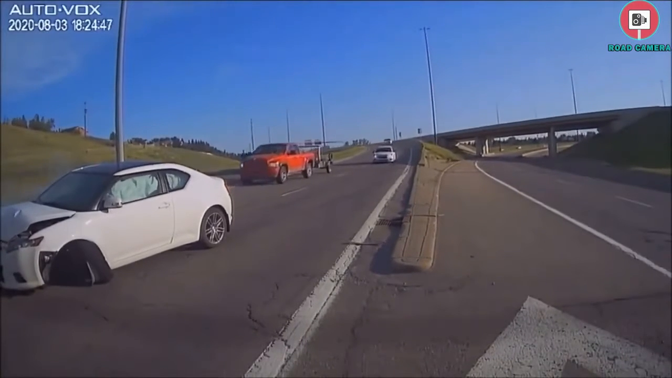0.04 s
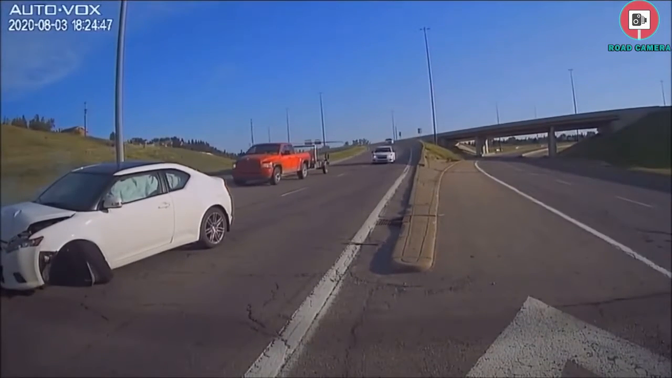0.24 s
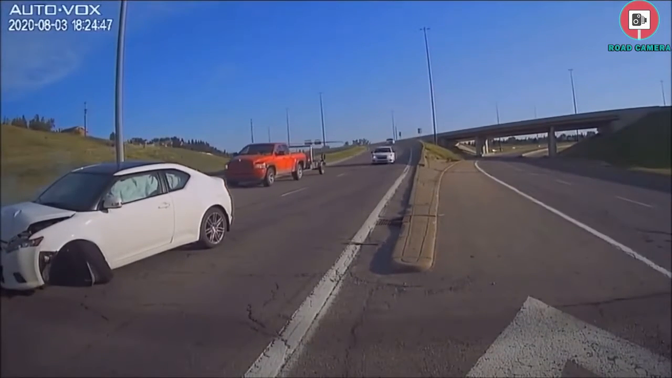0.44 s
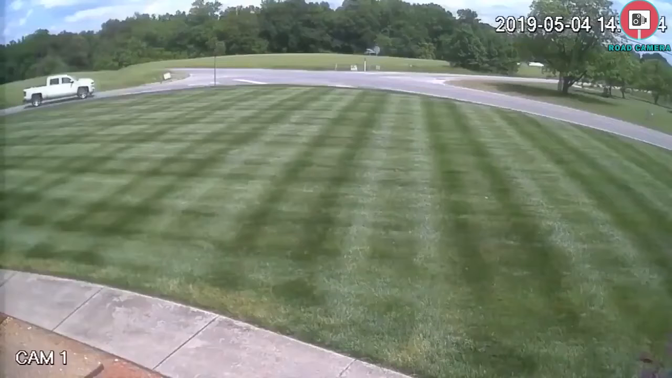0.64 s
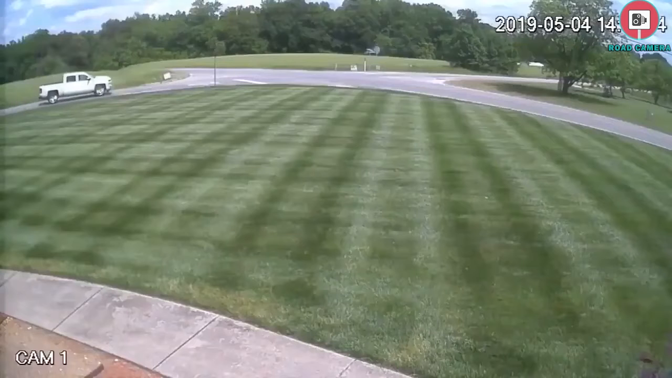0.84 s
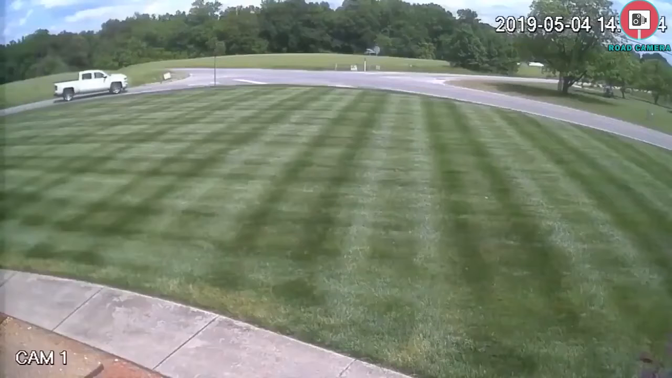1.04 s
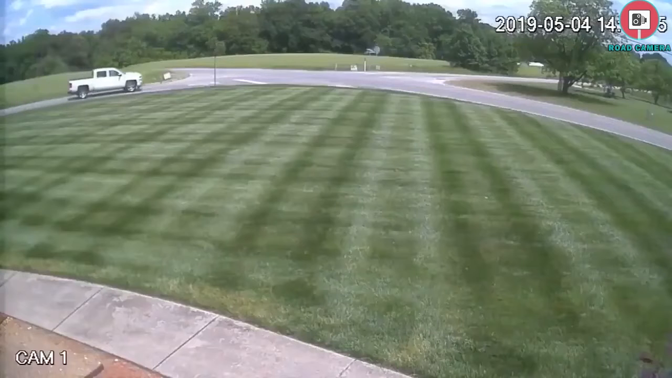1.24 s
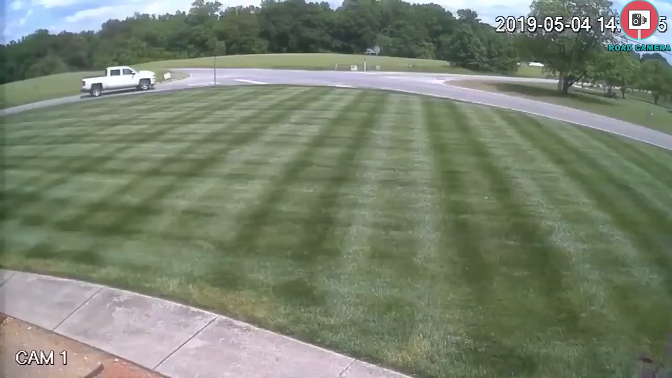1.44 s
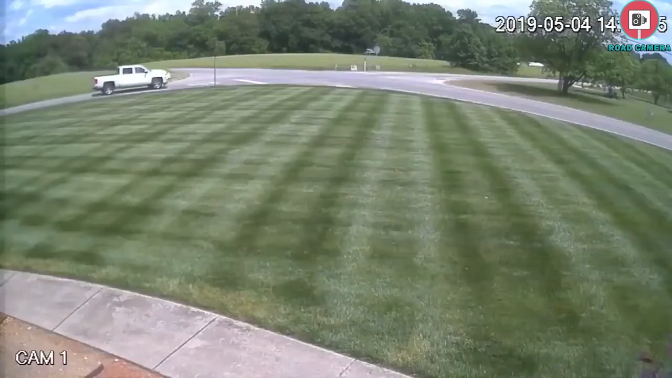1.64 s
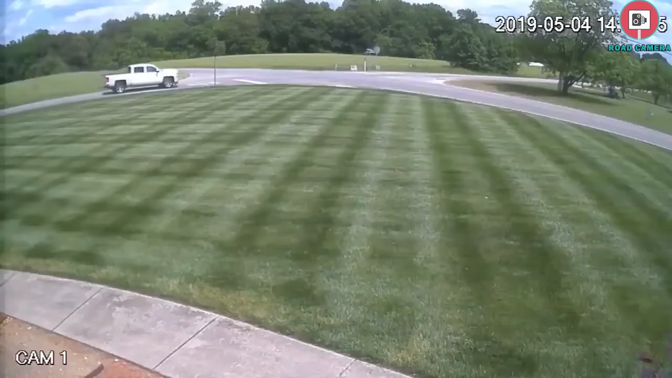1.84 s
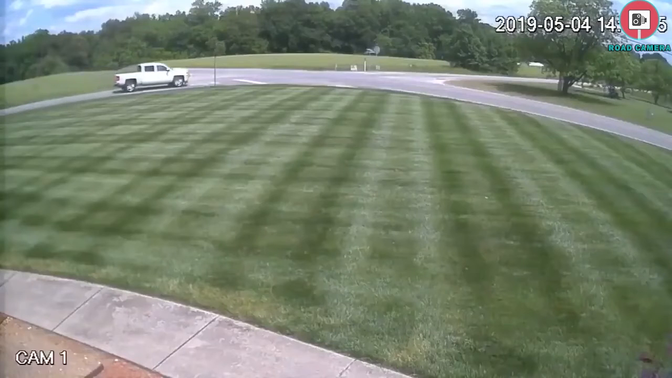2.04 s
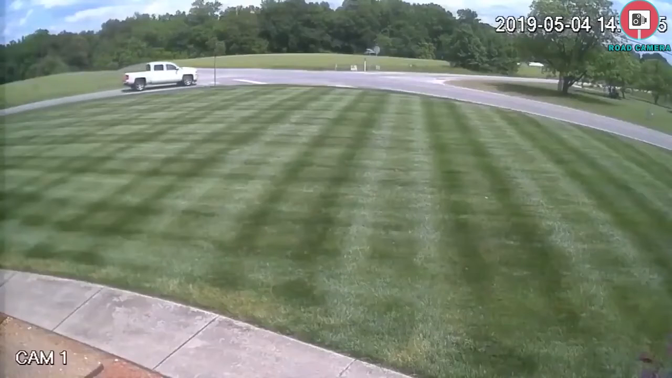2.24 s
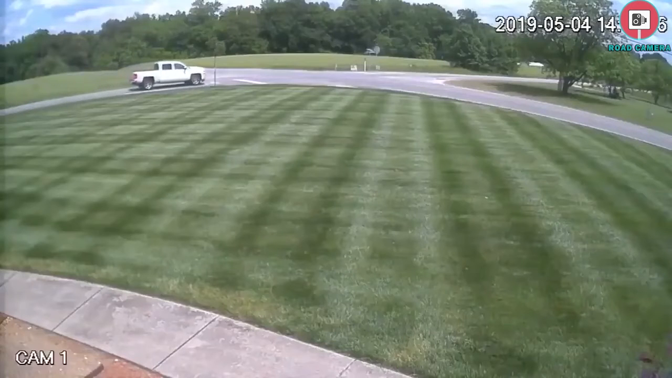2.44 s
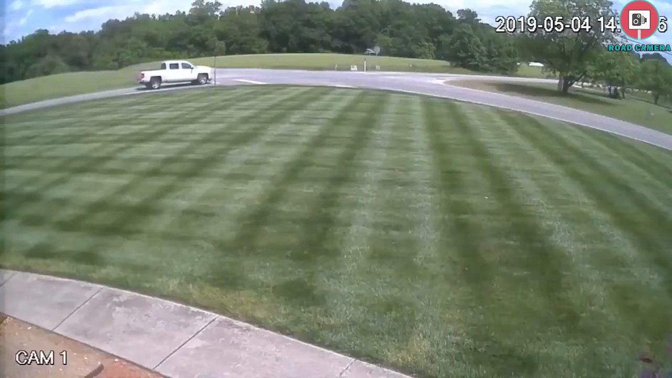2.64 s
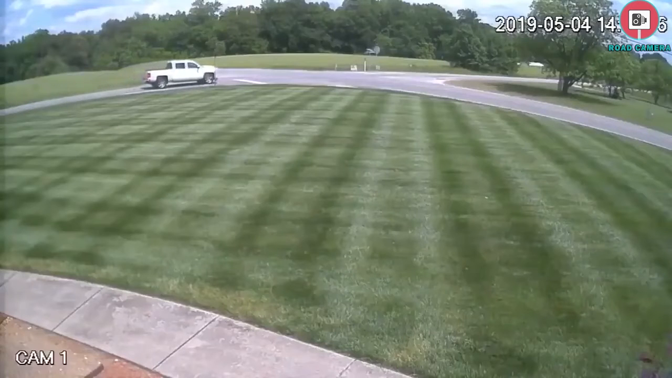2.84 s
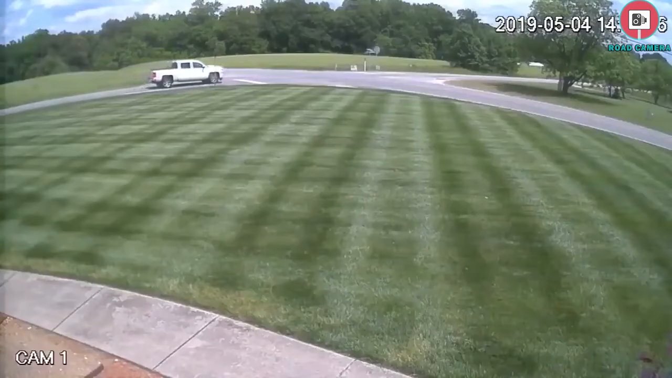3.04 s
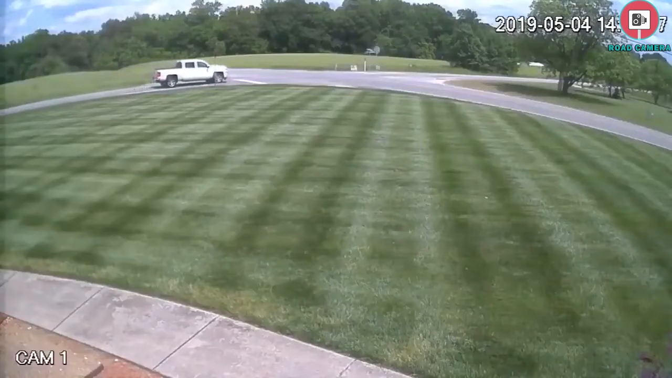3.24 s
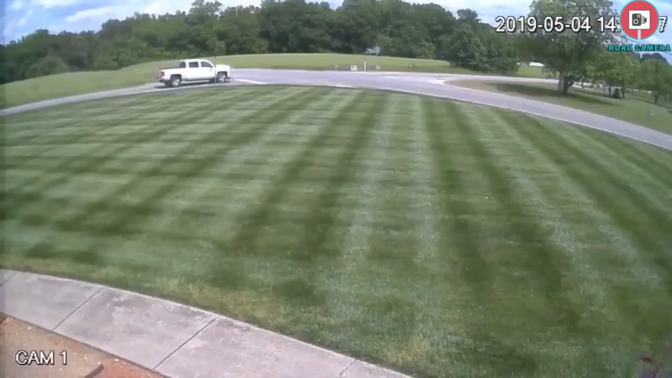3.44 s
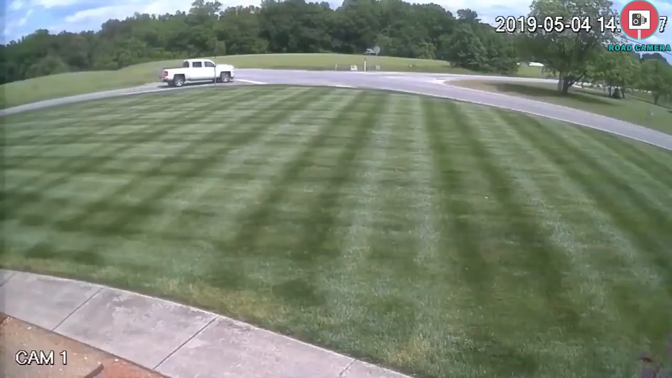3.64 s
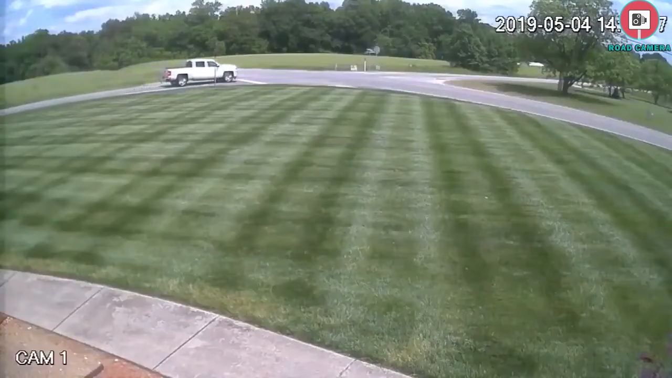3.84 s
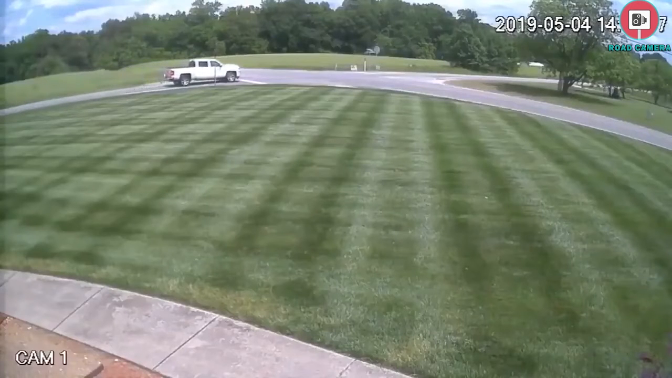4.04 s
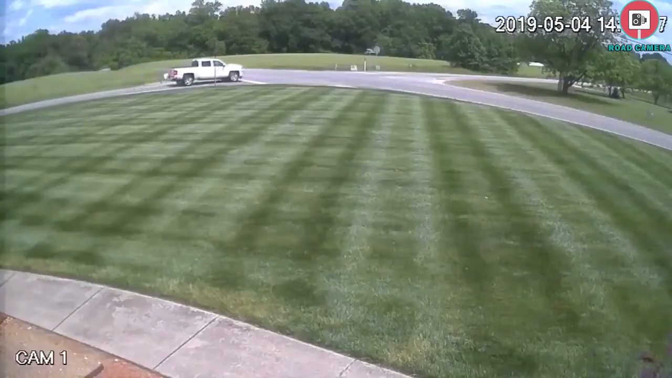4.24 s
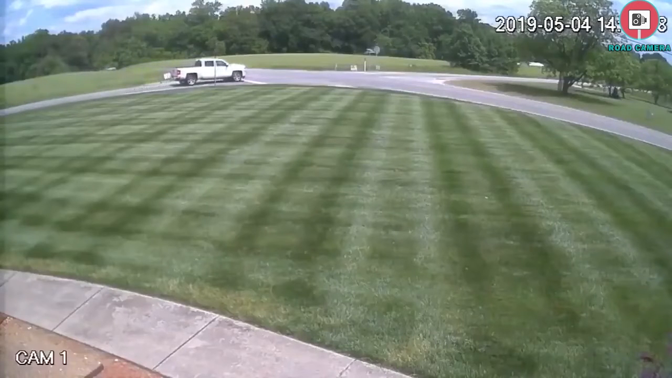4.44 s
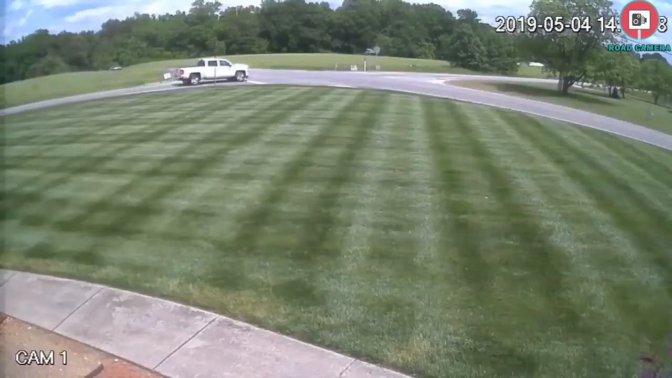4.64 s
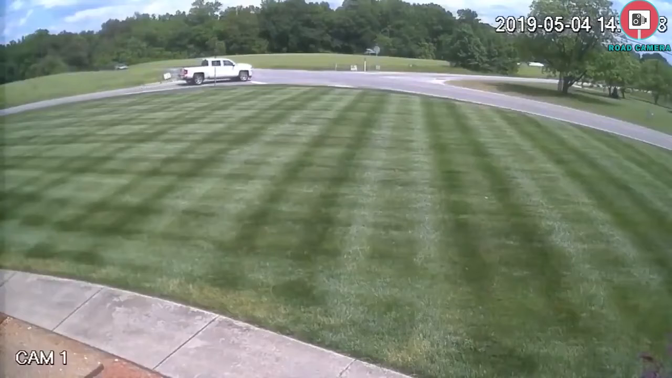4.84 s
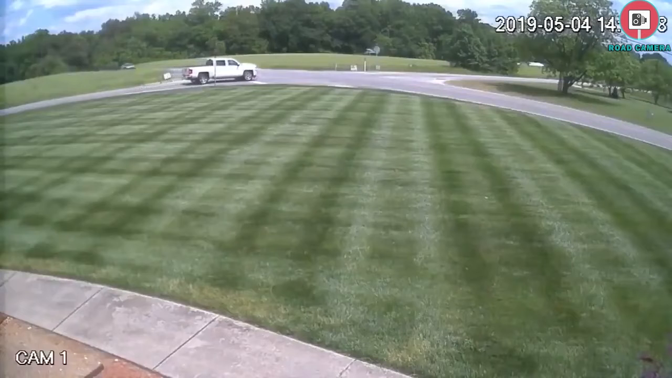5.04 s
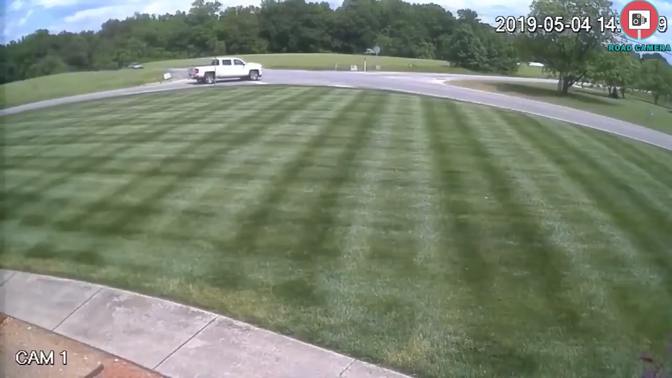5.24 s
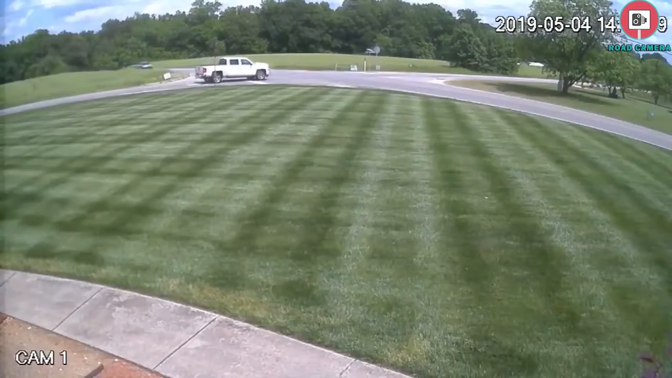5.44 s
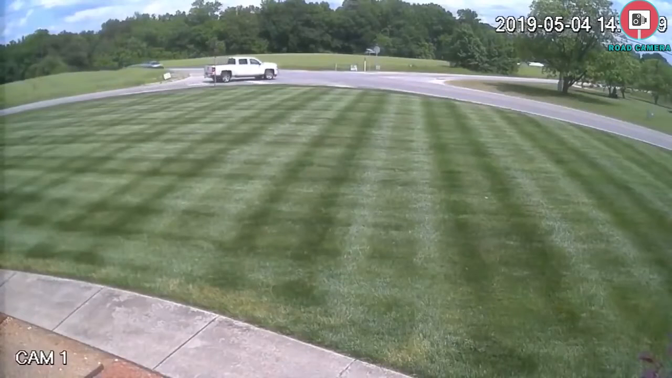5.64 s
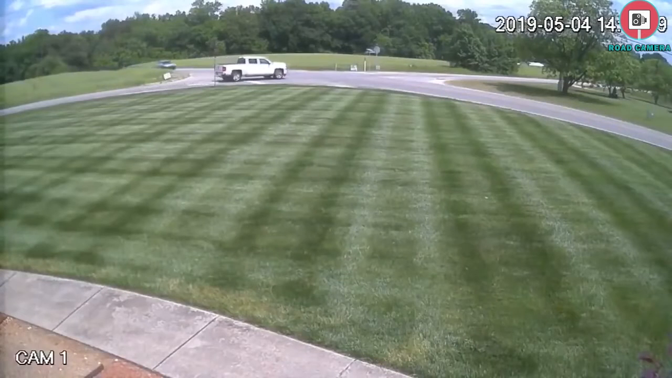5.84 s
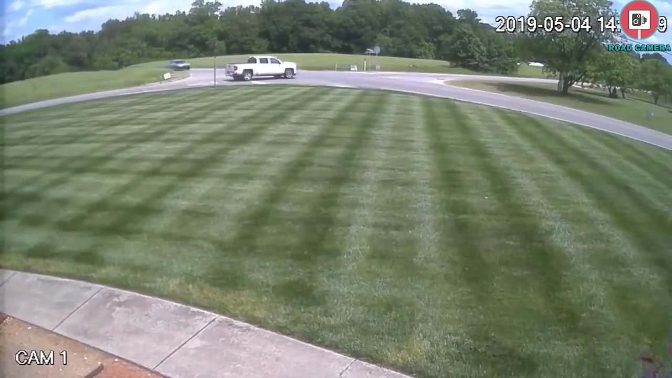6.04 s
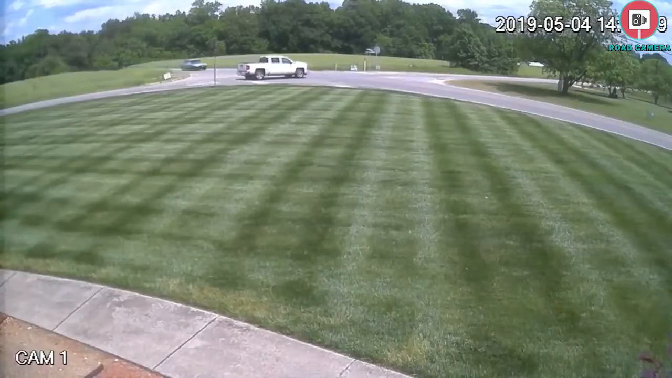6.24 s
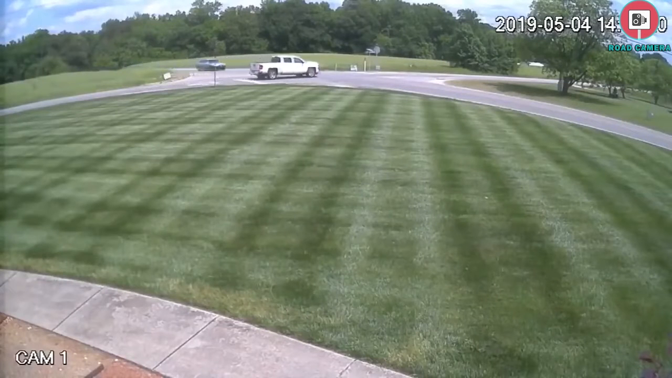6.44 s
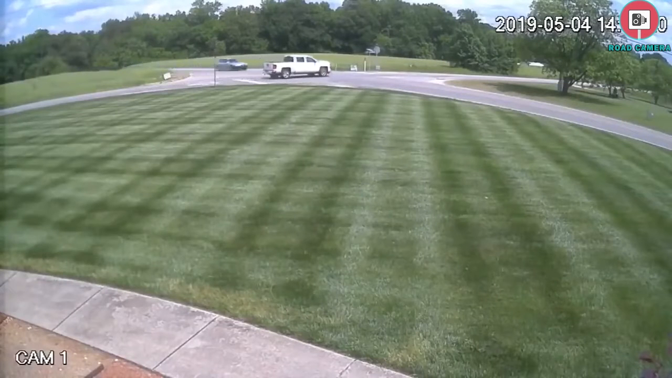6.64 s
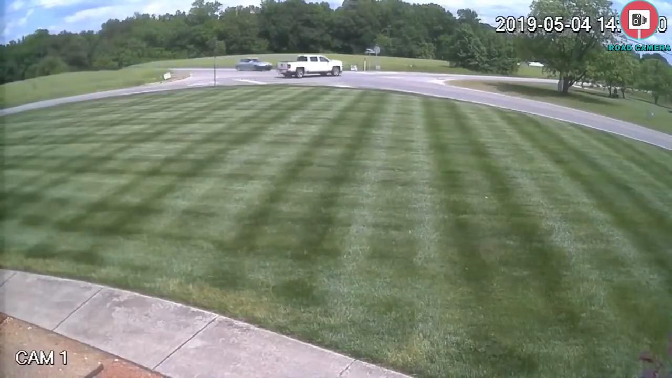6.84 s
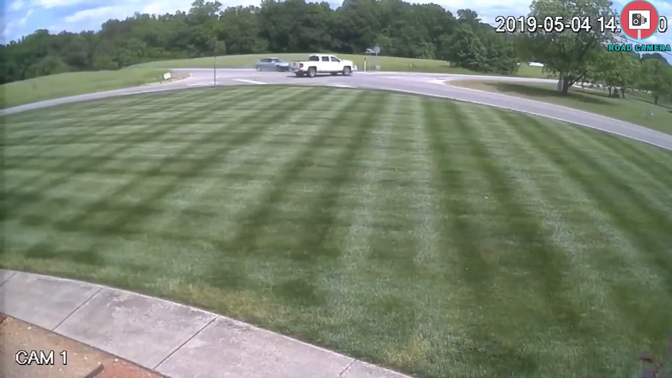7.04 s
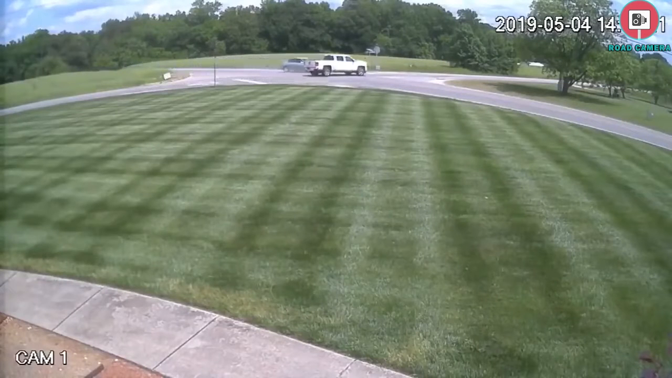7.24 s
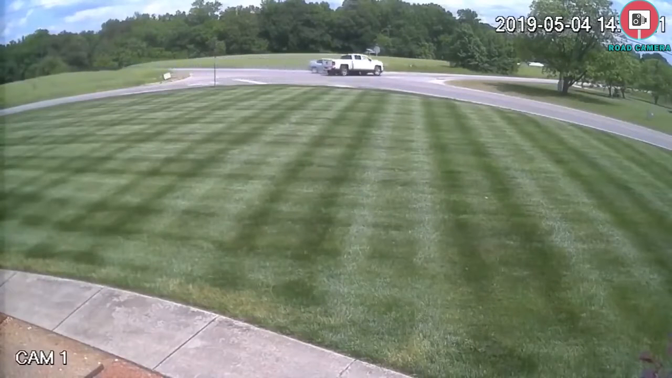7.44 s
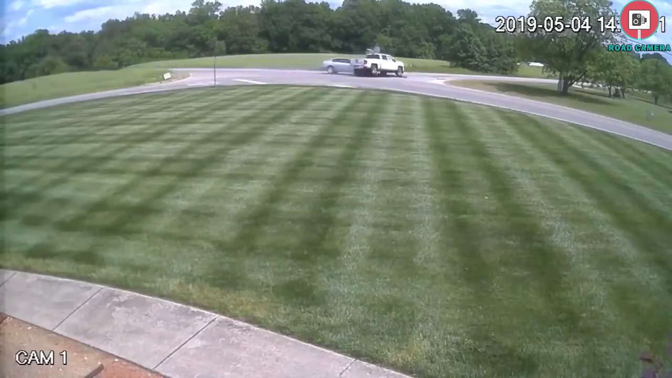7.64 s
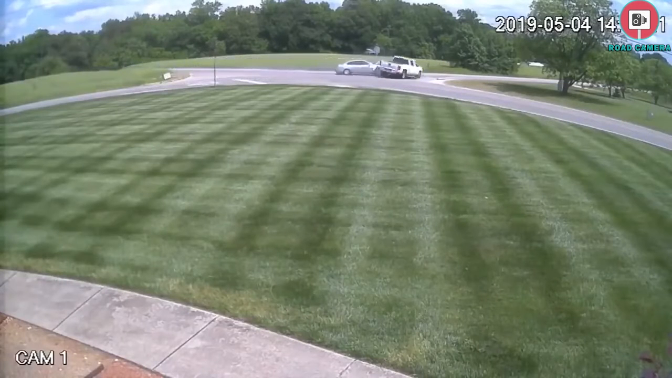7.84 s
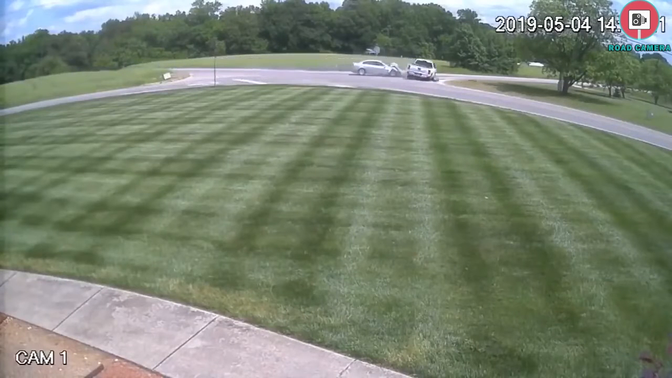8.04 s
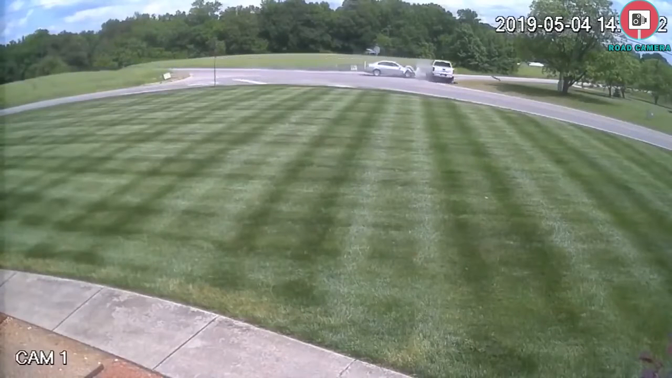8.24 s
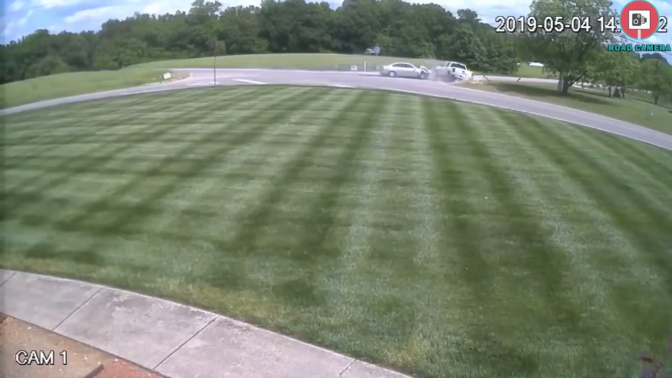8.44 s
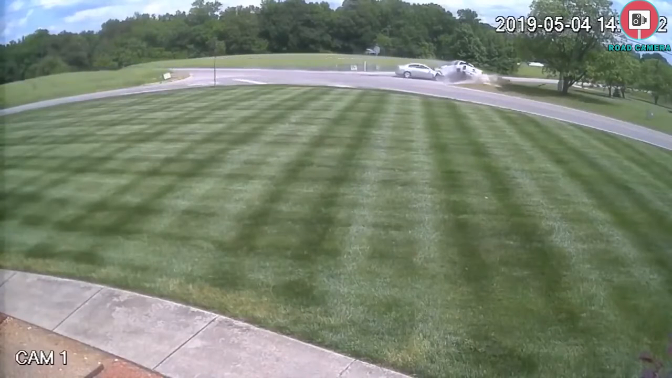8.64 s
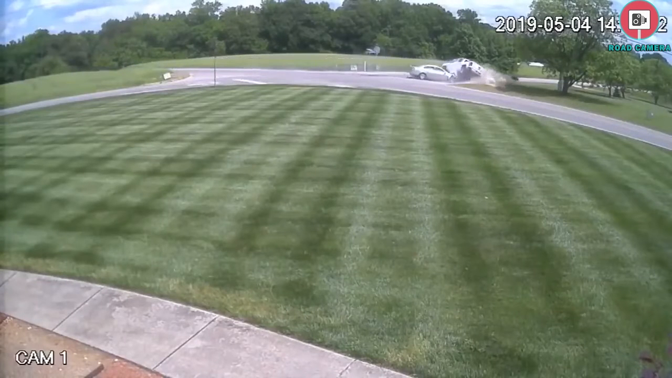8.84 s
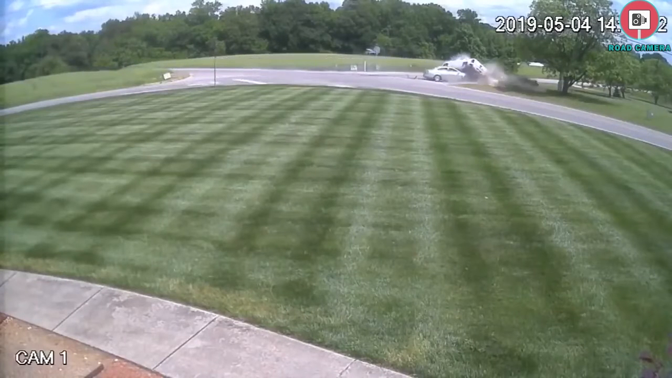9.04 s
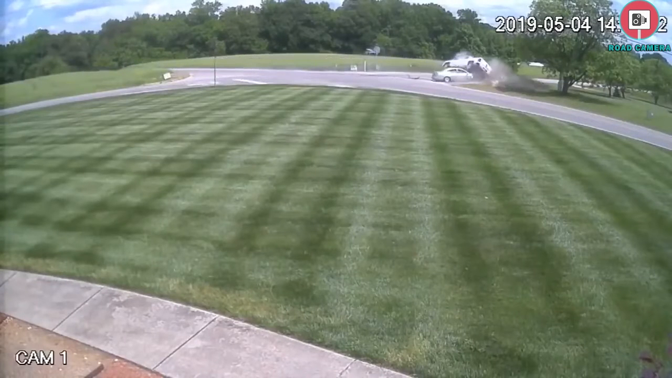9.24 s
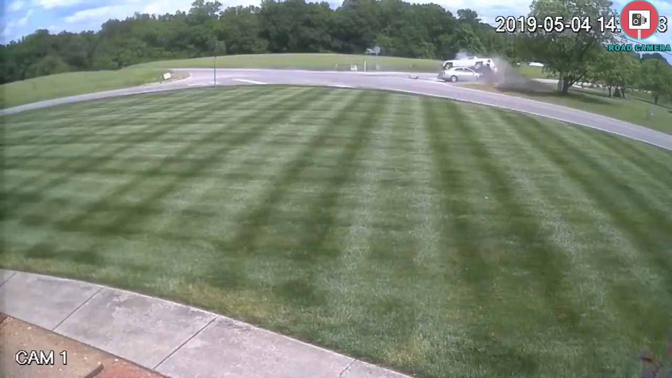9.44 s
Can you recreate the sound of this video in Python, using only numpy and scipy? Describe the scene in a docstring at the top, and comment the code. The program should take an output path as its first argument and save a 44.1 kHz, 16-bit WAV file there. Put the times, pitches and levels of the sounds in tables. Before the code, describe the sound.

A small outdoor roadside microphone, muffled and easily overloaded, picks up low steady rumble and tyre roar. Engine drone and growl build gradually. A short high chirp leads into a rough, wavering tyre squeal lasting under a second. The collision is sudden and very loud: distorted snaps and tearing panels, then crunching, rattling metal dragged along the road, fading until a deep thud and a last cracking bang.

```python
"""Road collision, roadside microphone

Through a small, dull outdoor microphone that overloads: shaped-noise road rumble and an engine drone grow,
a tyre chirps, then the tyres squeal as wavering tones over rubbery noise, with harsh overload treble. Panels
buckle in a volley of clipped snaps and tearing. Grains of metal crunch and groan along the road; the body
thuds down and bangs once more."""
import sys
import numpy as np
from scipy import signal
from scipy.fft import rfft, irfft
from scipy.io import wavfile

SR = 44100
rng = np.random.default_rng(int(sys.argv[2]) if len(sys.argv) > 2 else 0)


def master_out(mix):
    """Clip the mix to full scale and print it as 16-bit PCM to the path in sys.argv[1]."""
    frames = np.transpose(np.atleast_2d(mix))
    ceiling = np.clip(frames, -1, 1)
    pcm = np.round(ceiling * 32767).astype(np.int16)
    wavfile.write(sys.argv[1], SR, pcm)


N = 418950
TIME = np.arange(N) / SR
FREQ = np.maximum(np.fft.rfftfreq(N, 1 / SR), 1)

# Loudest cracks of buckling panels, drive before overload: start_s, drive_db, tear_length_s
PANEL_CRACKS = [(7.6525, -4, 0.00018), (7.6575, -0.5, .0006), (7.665, -6, .003), (7.6693, -2, .003),
                (7.6785, 4, .0022), (7.6852, 5, .0004), (7.6895, -3, .0015), (7.6985, -0.5, 0.0036),
                (7.7072, -1, .0013), (7.7172, 9.5, .0007), (7.7193, 1.5, .0044), (7.7285, -1, 0.0026),
                (7.7468, -1.5, 0.00087), (7.7553, -1.5, 0.0022), (7.7655, -1.5, 0.0036),
                (9.336, -6.5, 0.0036), (9.3685, -1, 0.001), (9.3742, -0.5, 0.0014), (9.4003, 1, .0005)]


def buckling():
    """Each panel gives way with a pressure snap and milliseconds of tearing, clipped by the microphone."""
    snaps, tears = np.zeros(N), np.zeros(N)
    t = np.arange(SR // 40) / SR
    rise = t / 0.00045
    snap = (rise * np.exp(1 - rise)) ** 2
    for k, (start, db, length) in enumerate(PANEL_CRACKS + volley()):
        span = slice(int(start * SR), int(start * SR) + len(t))
        # the overloaded microphone's pulses alternate in sign
        snaps[span] += undb(db) * (-1) ** k * snap
        fizz = undb(-31.5) * np.exp(-t / 0.0095)
        tears[span] += undb(db) * (np.exp(-(t / length) ** 4) + fizz)
    # the overloaded microphone clips the cracks and keeps the tearing dense
    tear_colour = [(350, -3.5), (900, 4), (2000, -0.5), (4000, -12), (9000, -14.5)]
    tearing = np.tanh(2 * colour(noise(), tear_colour))
    clipped = np.tanh(snaps * undb(2) + tears * tearing * undb(4))
    # the treble arrives muffled
    muffling = [(30, 1.5), (2100, -3.0), (3000, -7), (4000, -16), (5000, -35.5), (8000, -36.5), (15000, -43.0)]
    return shape(clipped, muffling)


# Lesser cracks follow at uneven gaps as the first impact closes up
VOLLEY_S, VOLLEY_GAP_S, VOLLEY_LENGTH_S = 7.733, .0064, .0021
VOLLEY_DB, VOLLEY_SPREAD_DB = -6, 2.5


def volley(count=9):
    """Lesser panel cracks scattered about an even spacing: rows of start_s, drive_db, tear_length_s."""
    cracks = []
    for k, (shift, size) in enumerate(rng.standard_normal((count, 2))):
        start = VOLLEY_S + VOLLEY_GAP_S * (k + .3 * shift)
        cracks.append((start, VOLLEY_DB + VOLLEY_SPREAD_DB * size, VOLLEY_LENGTH_S))
    return cracks


# The wreck is crushed each time it lands or is struck; strengths before each layer's trim:
# start_s, length_s, boom_db, crunch_db, crackle_db
CRUSH_EVENTS = [(7.79, .02, -13, -17.5, -32), (7.83, 0.12, -19.5, -17.5, -33), (8.08, 0.023, -31, -23, -44),
                (8.23, 0.039, -28, -14.5, -37), (8.3, .04, -25, -17, -40.5),
                (8.72, 0.093, -12.5, -32.5, -57), (8.825, 0.031, -12.5, -18.5, -48),
                (9.28, 0.067, -15, -13.5, -38), (9.39, 0.021, -10, -19, -42),
                (9.46, 0.052, -14, -21.5, -45)]
CRUSH_ATTACK_S, CRUSH_RELEASE_S, CRUMPLE_DB = 0.018, 0.044, -1.5
# Colours of body boom, sheet metal, plastic crunch and overload crackle: freq_hz, level_db
BOOM_COLOUR = [(30, -17), (52, -9.5), (95, -5), (130, -4), (180, 1), (220, -5.5), (290, -12.5), (360, -8)]
CRUMPLE_COLOUR = [(140, -42.5), (230, -8.5), (291, -7), (344, -0.5), (420, -4.5), (448, 3), (487, -5),
                  (590, -0.5), (709, -2.5), (915, 1.5), (1200, -11.5), (1250, -10), (1620, -43),
                  (2750, -120)]
CRUNCH_COLOUR = [(1100, -2.5), (1280, -7), (1400, 3), (1620, -2.5), (1800, -0.5), (1950, 5), (2130, -2.5),
                 (2350, -11), (2550, -13.5), (2700, -12), (3000, -23.5), (3600, -34.5), (4400, -62.5)]
CRACKLE_COLOUR = [(2000, -21), (3200, 8), (4200, -4.5), (5800, -14), (8000, -26.5), (12000, -31),
                  (16000, -34.5)]
# Metal digs into the road and groans: start_s, length_s, level_db
GROAN_EVENTS = [(8.085, 0.087, -8), (8.335, 0.033, -12), (8.58, .02, -16)]
# Partials of the groan: multiple_of_stick_slip_rate, level_db
GROAN_PARTIALS = [(1, 0), (2, -2.5), (3, -9.5), (4, -26)]
GROAN_HZ = 464.6  # stick-slip rate
# Between crushes it slides on, slowing: strength at the start (dB, before trims), and fall (dB per s)
SLIDE_S = 7.785
SLIDE_BOOM_DB, SLIDE_BOOM_FALL = -24.5, -3.5  # a negative fall grows
SLIDE_CRUMPLE_DB, SLIDE_CRUMPLE_FALL = -15, 5.8
SLIDE_CRUNCH_DB, SLIDE_CRUNCH_FALL = -17, 5.7
SLIDE_CRACKLE_DB, SLIDE_CRACKLE_FALL = -39.5, 11.4


def wreck():
    """Sheet metal crumples, plastic crunches, the body booms, dragged metal groans; bright overload crackle on top."""
    age = np.maximum(TIME - SLIDE_S, 0)
    weight, crush, overload = (
        swells(CRUSH_EVENTS, CRUSH_ATTACK_S, CRUSH_RELEASE_S, order=k) for k in (2, 3, 4))

    boom_slide = undb(SLIDE_BOOM_DB - SLIDE_BOOM_FALL * age)
    boom = colour(noise(), BOOM_COLOUR) * np.hypot(weight, boom_slide) * undb(-2.5)

    crumple_slide = undb(SLIDE_CRUMPLE_DB - SLIDE_CRUMPLE_FALL * age)
    crumple = colour(grains(2000, spread_db=2.5), CRUMPLE_COLOUR) * undb(2.0 * walk(30))
    crumple = crumple * np.hypot(crush * undb(CRUMPLE_DB), crumple_slide)

    crunch_slide = undb(SLIDE_CRUNCH_DB - SLIDE_CRUNCH_FALL * age)
    crunch = colour(grains(4000, spread_db=2.5), CRUNCH_COLOUR) * undb(0.76 + 0.85 * walk(50))
    crunch = crunch * np.hypot(crush, crunch_slide)

    # bright overload crackle over the crunch
    crackle_slide = undb(SLIDE_CRACKLE_DB - SLIDE_CRACKLE_FALL * age)
    crackle = colour(grains(2500, spread_db=3), CRACKLE_COLOUR)
    crackle = crackle * np.hypot(overload, crackle_slide) * undb(-4.5)

    groan = tone(np.full(N, GROAN_HZ), GROAN_PARTIALS, jitter=.075, flutter_db=3.5, rate=110)
    groan = groan * swells(GROAN_EVENTS, attack_s=.022, release_s=0.031)
    return window(SLIDE_S, N / SR) * (boom + crumple + crunch + crackle + groan)


# Heavy blows, ringing before the panel's filter: start_s, panel_pitch_hz, ringing_db, thud_db, decay_s
HEAVY_BLOWS = [(7.795, 820, -10, -15.5, 0.025), (7.855, 1050, -7, -31, 0.065),
               (7.925, 1765, -15.5, -40, 0.042), (8.075, 931, -20, -43, 0.055),
               (8.125, 420, -14, -36, 0.039), (8.251, 531, -14.5, -32, 0.024),
               (8.325, 859, -18, -41, 0.025), (8.5, 945, -9, -46, 0.027), (8.575, 946, -12.5, -27.5, 0.044),
               (8.745, 360, -29, -9, 0.062), (9.274, 1983, -17, -15.5, 0.044),
               (9.386, 880, -23, -17, 0.038)]
# Panel modes: multiple_of_panel_pitch, level_db
PANEL_MODES = [(1, 9), (1.524, -11), (2.1, -26.5)]


def blows():
    """Heavy contacts each rattle another panel and set the whole shell thudding."""
    ring, thud, pitch = np.zeros(N), np.zeros(N), np.zeros(N)
    for start, hz, ring_db, thud_db, decay in HEAVY_BLOWS:
        age = np.maximum(TIME - start, 0)
        push = np.minimum(age / 0.0062, 1) * np.exp(-(age / decay) ** 2 / 2)
        ring += undb(ring_db) * push
        thud += undb(thud_db) * push
        pitch[TIME >= start] = hz
    panel = tone(pitch, PANEL_MODES, jitter=0.05695, flutter_db=5, rate=120.6)
    panel = shape(panel, [(200, -4.5), (2150, -5.0), (2600, -9.5)])
    shell = tone(np.full(N, 155), [(1, 0), (2, -13.5)], jitter=0.1667, flutter_db=2.5, rate=72.3)
    return ring * panel + thud * shell


# Brief bright crackles on their own: start_s, level_db
LONE_CRACKLES = [(8.245, -39), (8.788, -48), (8.831, -45), (9.289, -42), (9.408, -51)]


def lone_crackles():
    """Dense random clicks, filtered bright, heard in bursts of a few milliseconds."""
    bursts = sum(undb(db) * window(start, start + 0.0025, edge=.002) for start, db in LONE_CRACKLES)
    bright = [(2500, 8), (3800, 4), (5800, 3), (7000, -9.0), (10000, -15.5), (15000, -21.0)]
    return bursts * colour(grains(6000, spread_db=3), bright)


# How hard the tyres scrub, relative to full effort: time_s, effort_db
SCRUB_EFFORT = [(6.6, -26), (6.73, -8.5), (6.81, -4.5), (7.04, -6), (7.13, -0.5), (7.32, -0.07), (7.42, -6),
                (7.65, -11)]
# Colour of scrubbing rubber: freq_hz, level_db
RUBBER_COLOUR = [(250, -5.5), (550, -10.5), (950, 0), (1400, 9.5), (1650, 1), (1950, 11), (2400, -3),
                 (2800, -13), (3500, -25), (4500, -49.5), (7000, -55.5), (15000, -63.5)]
# First chirps as the tread lets go: start_s, length_s, level_db
CHIRP_EVENTS = [(6.685, 0.023, -16.5), (6.715, .011, -9.5), (6.748, 0.025, -6.5)]
CHIRP_HZ, CHIRP_TAIL_DB, CHIRP_HARSH_DB = 1963, -23, -47
# Main squeal, level before surges: time_s, pitch_hz, level_db
SQUEAL_TRACK = [(6.78, 1230, -34), (6.87, 1184, -22.5), (7.03, 1160, -21.5), (7.3, 1127, -16.5),
                (7.53, 1178, -18.5), (7.58, 1205, -27), (7.65, 1190, -34)]
# The tread grabs and the squeal surges, gain added to 1: start_s, length_s, added_gain_db
TREAD_GRABS = [(6.858, 0.0073, 1.5), (6.897, 0.032, 7), (6.989, 0.063, 4), (7.12, 0.014, 0),
               (7.207, .015, 4)]
# Rasp of tearing rubber, sounding at 0.96 of the pitch: time_s, pitch_hz, level_db
RASP_TRACK = [(6.66, 2235, -34), (6.72, 2276, -19.5), (6.81, 2805, -31.5), (6.92, 2430, -33),
              (7.5, 2477, -37)]
# Sounds that break out under hard scrubbing: level at full effort, and dB gained per dB of effort
SECOND_TYRE_HZ, SECOND_TYRE_DB, SECOND_TYRE_GROWTH = 1055, -16, 1.9
WHISTLE_HZ, WHISTLE_DB, WHISTLE_GROWTH = 2120, -16, 4
HARSH_DB, HARSH_GROWTH = -56, 1.7  # overload treble
PITCH_SAG = .005  # share by which second tyre and whistle drop in pitch per dB of effort


def skid():
    """Tread blocks stick and slip at several pitches over scrubbing rubber; braking shakes the body."""
    effort_db = curve(SCRUB_EFFORT, 1)
    skid_end = SCRUB_EFFORT[-1][0]
    sliding = window(SCRUB_EFFORT[0][0], skid_end)
    all_locked = window(7.08, skid_end)
    bend = 1 - PITCH_SAG * effort_db

    chirps = swells(CHIRP_EVENTS, attack_s=.014, release_s=0.0088)
    chirp_tail = undb(CHIRP_TAIL_DB) * swell(6.77, 0.037, attack_s=.02, release_s=.25)
    chirp = tone(np.full(N, CHIRP_HZ), [(1, 0), (2, -41), (3, -46)], jitter=.036, flutter_db=3.5, rate=170)
    chirp = chirp * np.maximum(chirps, chirp_tail)

    surges = 1 + swells(TREAD_GRABS, attack_s=.003, release_s=0.0043)
    squeal = tone(curve(SQUEAL_TRACK, 1), [(1, 0), (2, -22)], jitter=.02, flutter_db=5, rate=170)
    squeal = squeal * loudness(SQUEAL_TRACK, 2) * surges * undb(2.15 * walk(35))

    second = tone(SECOND_TYRE_HZ * bend, [(1, 0), (2, -20)], jitter=.028, flutter_db=3.5, rate=130)
    second = second * undb(SECOND_TYRE_DB + SECOND_TYRE_GROWTH * effort_db)
    whistle = tone(WHISTLE_HZ * bend, [(1, 0)], jitter=0.01374, flutter_db=4, rate=104)
    whistle = whistle * undb(WHISTLE_DB + WHISTLE_GROWTH * effort_db)
    rasp = tone(curve(RASP_TRACK, 1), [(0.96, 0)], jitter=.06, flutter_db=4.5, rate=251)
    rasp = rasp * loudness(RASP_TRACK, 2)

    scrub = colour(noise(), RUBBER_COLOUR) * undb(effort_db - 16.0 + 1.5 * walk(60))
    # harsh overload treble on the chirp and squeal
    harsh_colour = [(3300, 6.5), (4100, 9), (4800, -1.0), (5900, 1.5), (7200, -21.5), (10000, -19.5),
                    (15000, -25.5)]
    harsh = colour(grains(4500, spread_db=2.5), harsh_colour)
    harsh = harsh * (undb(HARSH_DB + HARSH_GROWTH * effort_db) + undb(CHIRP_HARSH_DB) * chirps)
    judder = resonate(noise(), [(109, 22, -5.0), (171.6, 45, 3)])
    judder = judder * window(6.95, 7.65, edge=0.22) * undb(-28)
    return sliding * (chirp + scrub + harsh) + all_locked * (second + whistle) + squeal + rasp + judder


# Driving, before a fixed trim on each layer: time_s, tyre_roar_db, air_hiss_db
DRIVE_LEVELS = [(0.75, -39, -54.5), (0.85, -39, -54.5), (1.82, -39, -53), (3.02, -41, -57.5),
                (4.73, -38, -59), (5.67, -36.5, -57.5), (6.51, -30, -54.5), (6.58, -30, -57)]
# Colours of road rumble, tyre roar and air hiss: freq_hz, level_db
RUMBLE_COLOUR = [(25, -21.5), (40, -8), (56, -7.5), (76, -2.5), (102, -9.5), (130, 4), (155, -10.5),
                 (210, -7), (300, -15), (370, -18), (430, -35), (600, -22.5)]
ROAR_COLOUR = [(450, -1.5), (540, -5.5), (640, 0.5), (730, -5), (820, 2), (910, 3.5), (990, -5.5),
               (1110, -1.5), (1340, -3), (1550, 3), (1850, 0.5), (2130, -2.5), (2350, -23), (3000, -36)]
AIR_COLOUR = [(1500, -26), (2300, 12.5), (2500, 7), (2850, 1.5), (3200, -7), (4000, -15.5), (4600, -33.5),
              (7000, -38), (15000, -47.5)]
# Resonances in the rumble: freq_hz, width_hz, level_db
RUMBLE_RESONANCES = [(69, 8, -3), (89.3, 7, -0.5), (170, 9.3, -1), (241.2, 12, -6), (350.7, 39.5, -12)]
# Exhaust drone: time_s, pitch_hz
DRONE_PITCH = [(.7, 148), (3.6, 144.5), (5.4, 138), (6.3, 123)]
# Engine partials: multiple_of_firing_rate, level_db
ENGINE_PARTIALS = [(3, 0), (4, -5), (5, -12), (6, -2), (7, -7)]
# Swells of deep shaking rumble: start_s, length_s, level_db
SHAKE_EVENTS = [(3.93, .2, -37), (4.3, .6, -41), (5.02, 0.71, -34.5), (6.27, .12, -38), (6.88, .75, -34),
                (7.7, .12, -27)]
# The rumble is steady at first, then grows; its level is that of the blend below
RUMBLE_DB, RUMBLE_GROWS_S, RUMBLE_DB_PER_S = -32.5, 3.28, 1.5
# The engine under load slows a little; the firing rate is that at LOADED_S
FIRING_HZ, FIRING_SAG_HZ_PER_S, LOADED_S = 70.46, .4, 5.75


def driving():
    """Road rumble, tyre roar and air hiss as coloured noise, with engine drone and growl and one faint squeak."""
    road = colour(noise(), RUMBLE_COLOUR) * undb(-3.5)
    road = road + resonate(noise(), RUMBLE_RESONANCES) * undb(-5.5)
    growth_db = RUMBLE_DB_PER_S * np.clip(TIME - RUMBLE_GROWS_S, 0, 2.9)  # growth stops after 2.9 s
    rumble = road * undb(RUMBLE_DB + growth_db)
    roar = colour(noise(), ROAR_COLOUR) * undb(curve(DRIVE_LEVELS, 1) + 0.8 + .5 * walk(5))
    air = colour(noise(), AIR_COLOUR) * undb(curve(DRIVE_LEVELS, 2) + 3.0)

    drone = tone(curve(DRONE_PITCH, 1), [(1, 0)], jitter=.012, flutter_db=-0.5, rate=9)
    drone = drone * undb(-33) * swell(3.7, 1.7, attack_s=2.66, release_s=.9)
    firing_hz = FIRING_HZ - FIRING_SAG_HZ_PER_S * (TIME - LOADED_S)
    firing = tone(firing_hz, ENGINE_PARTIALS, jitter=.0025, flutter_db=2.5, rate=6)
    load = undb(-36) * swell(LOADED_S, 0.37, attack_s=.55, release_s=0.21)
    growl = resonate(noise(), [(248, 48, 0)])
    growl = growl * undb(-35.5) * swell(6.0, .2, attack_s=.8, release_s=0.32)

    shake = resonate(noise(), [(52, 8.6, 0)]) * swells(SHAKE_EVENTS, attack_s=.06, release_s=.07)
    squeak = resonate(noise(), [(2050, 76, 0)]) * window(2.09, 2.14, edge=0.023) * undb(-41.0)
    return rumble + roar + air + drone + firing * load + growl + shake + squeak


def undb(db):
    """Decibels to gain."""
    return 10 ** (np.asarray(db) / 20)


def unit(x):
    """Scale to rms 1."""
    return x / np.sqrt(np.mean(x ** 2))


def noise():
    """White noise."""
    return rng.standard_normal(N)


def curve(table, order):
    """One column of a table, joined by straight lines in time."""
    return np.interp(TIME, np.array(table)[:, 0], np.array(table)[:, order])


def window(start, end, edge=0.017):
    """1 between two times, with short ramps outside them."""
    return np.clip(1 + np.minimum(TIME - start, end - TIME) / edge, 0, 1)


def loudness(table, order):
    """Gain from a dB column, fading to silence outside the table's times."""
    return undb(curve(table, order)) * window(table[0][0], table[-1][0])


def swell(start, length, attack_s, release_s):
    """Exponential attack up to the start, a hold at 1, exponential release."""
    before = np.maximum(start - TIME, 0) / attack_s
    after = np.maximum(TIME - start - length, 0) / release_s
    return np.exp(-np.minimum(before + after, 20))


def swells(table, attack_s, release_s, order=2):
    """Gain of a table of start_s, length_s, level_db.. events; the strongest at each moment counts."""
    gains = [undb(row[order]) * swell(row[0], row[1], attack_s, release_s) for row in table]
    return np.max(gains, axis=0)


def shape(x, points):
    """Filter by (Hz, dB) points, falling off below the first and steeply above the last."""
    hz, db = np.transpose(points)
    skirts = np.minimum(FREQ / hz[0], 1) ** 2 * np.minimum(hz[-1] / FREQ, 1) ** 8
    return irfft(rfft(x) * skirts * undb(np.interp(np.log(FREQ), np.log(hz), db)), N)


def colour(x, points):
    """Filter by (Hz, dB) points, then scale to rms 1."""
    return unit(shape(x, points))


def resonate(x, modes):
    """Pass a sound through steep (Hz, width Hz, dB) resonances; rms 1."""
    response = 0
    for hz, width, db in modes:
        detuning = (FREQ ** 2 - hz ** 2) / (FREQ * width * 2)
        response = response + undb(db) / (1 + 1j * detuning) ** 2
    return unit(irfft(rfft(x) * response, N))


def walk(rate):
    """Smooth chance of spread 1 that changes about rate times a second."""
    return unit(irfft(rfft(noise()) * np.exp(-(FREQ / rate) ** 2), N))


def grains(rate, spread_db):
    """Random clicks of uneven size and either sign, about rate of them a second."""
    hits = rng.random(N) < rate / SR
    return hits * np.sign(noise()) * undb(spread_db * np.clip(noise(), -2, 2))


def tone(hz, orders, jitter, flutter_db, rate):
    """A self-sustained vibration whose pitch wavers and whose strength flutters within bounds; rms 1."""
    phase = 2 * np.pi * np.cumsum(hz * (1 + jitter * walk(rate))) / SR
    wave = sum(undb(db) * np.sin(k * phase + 2 * np.pi * rng.random()) for k, db in orders)
    return unit(wave * undb(flutter_db * np.tanh(walk(rate))))


START_S = .706  # silence before this


def scene():
    """All sources at the one microphone."""
    # the overloaded microphone briefly chokes road and tyre sound during the first cracks
    road = (driving() + skid()) * undb(-16 * window(7.68, 7.74, edge=0.03))
    mix = road + buckling() + wreck() + blows() + lone_crackles()
    return (mix * window(START_S, N / SR, edge=0.00097))[None]


TOP_HZ = 15800  # the microphone's upper limit


def record(dry):
    """The microphone rounds off the loudest peaks; the top is cut."""
    knee = 5
    rounded = dry / (1 + np.abs(dry) ** knee) ** (1 / knee)
    top_cut = signal.ellip(8, .2, 70, TOP_HZ, fs=SR, output="sos")
    return signal.sosfilt(top_cut, rounded)


dry = scene()
out = record(dry)
master_out(out)
```